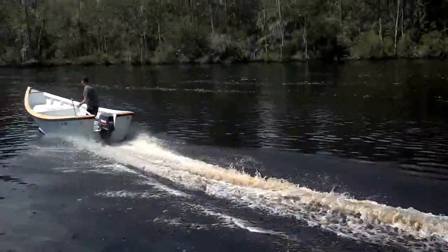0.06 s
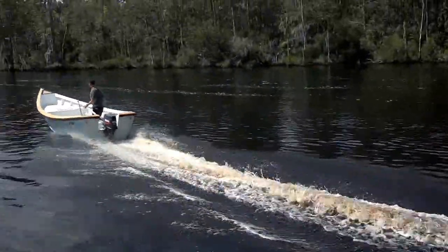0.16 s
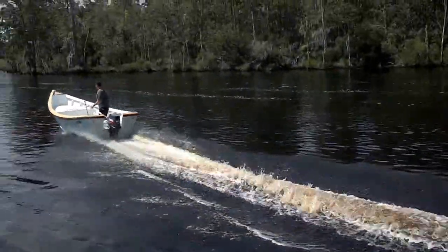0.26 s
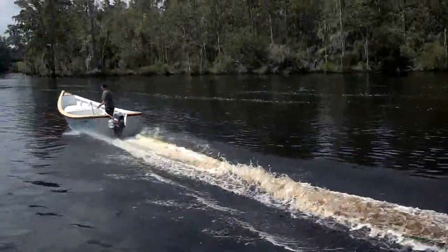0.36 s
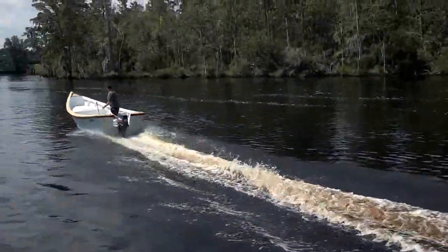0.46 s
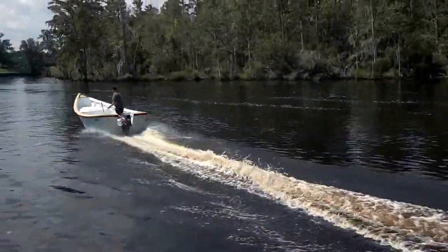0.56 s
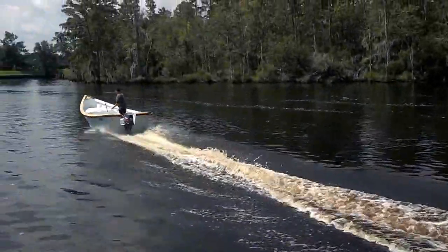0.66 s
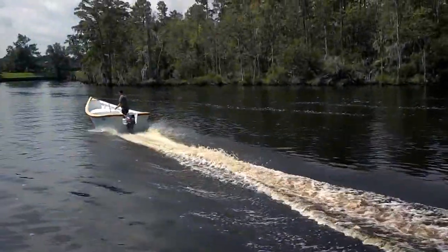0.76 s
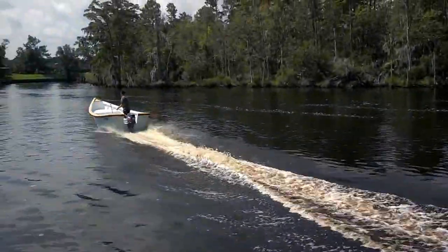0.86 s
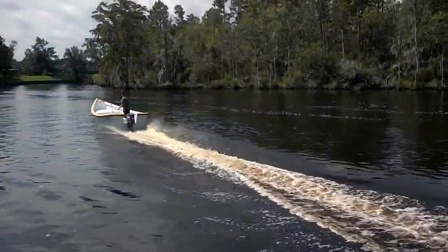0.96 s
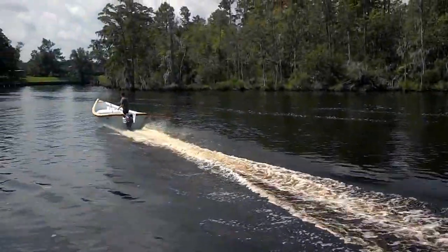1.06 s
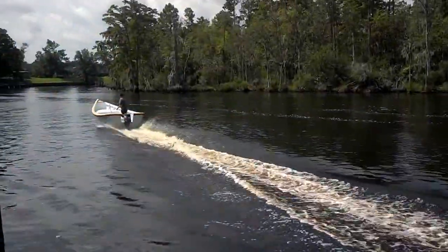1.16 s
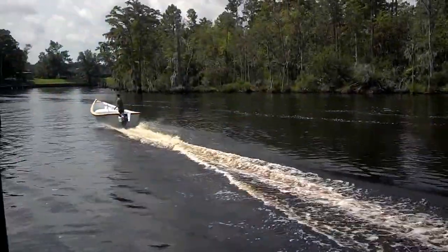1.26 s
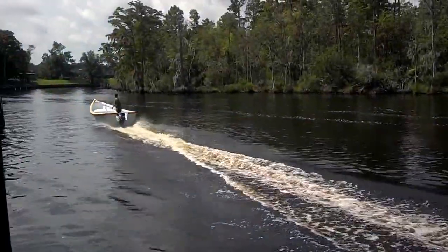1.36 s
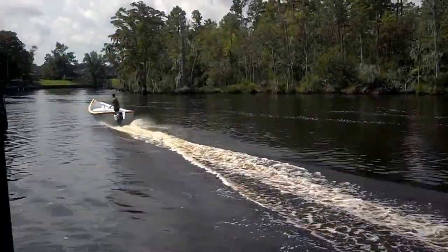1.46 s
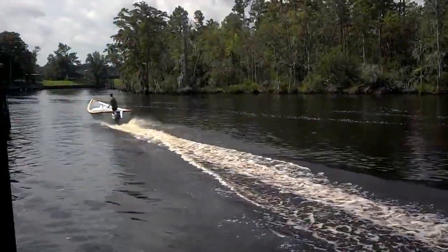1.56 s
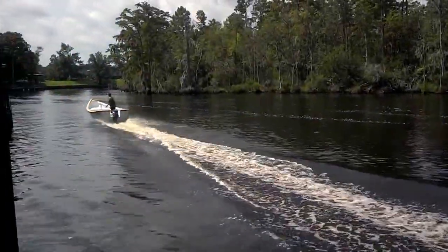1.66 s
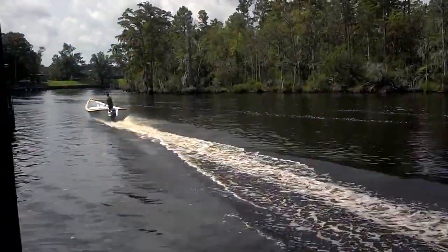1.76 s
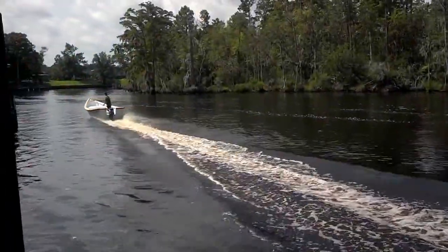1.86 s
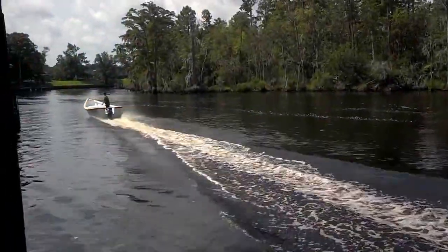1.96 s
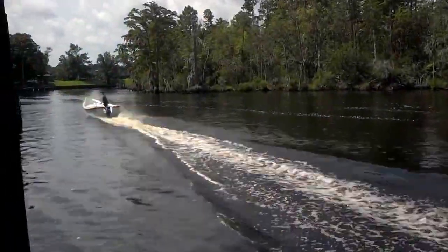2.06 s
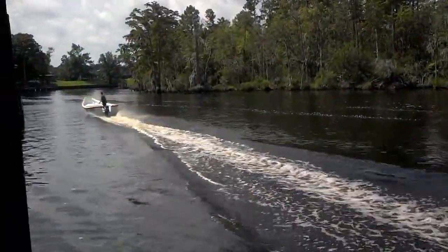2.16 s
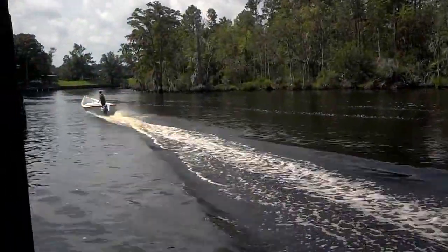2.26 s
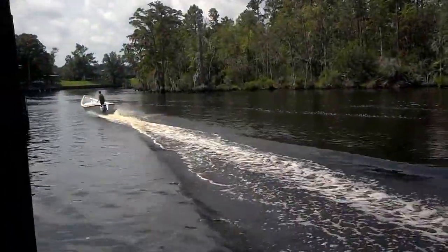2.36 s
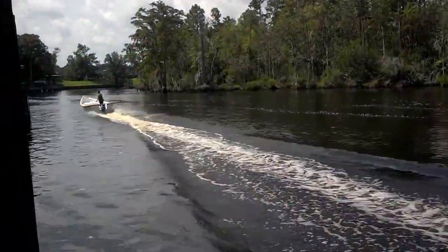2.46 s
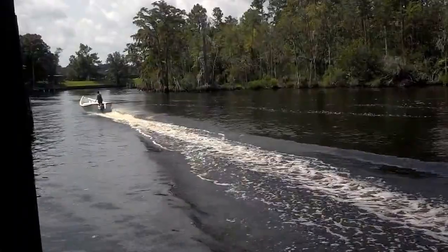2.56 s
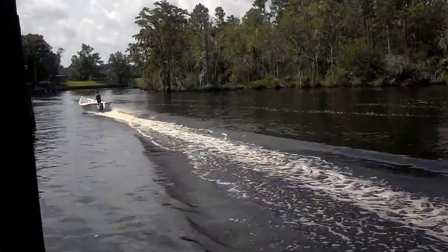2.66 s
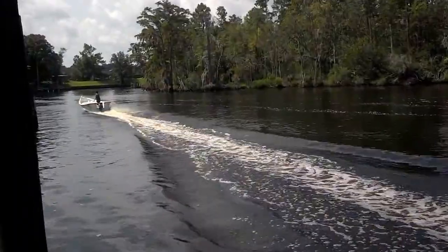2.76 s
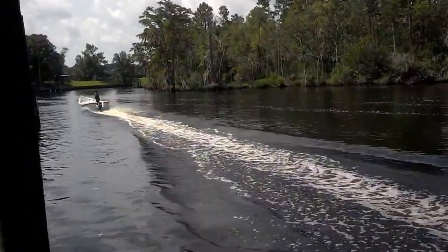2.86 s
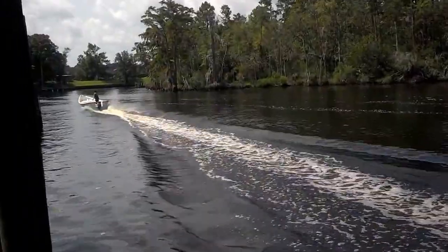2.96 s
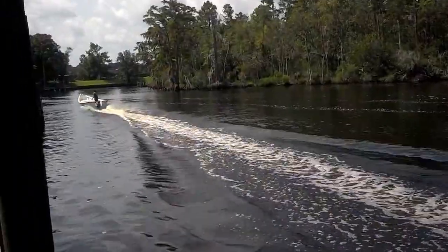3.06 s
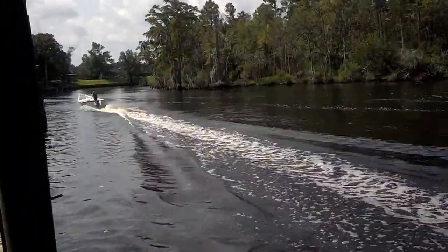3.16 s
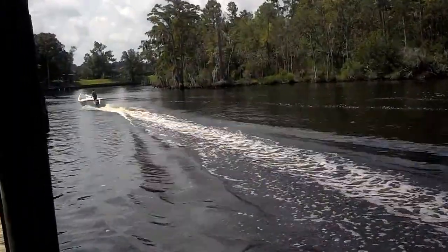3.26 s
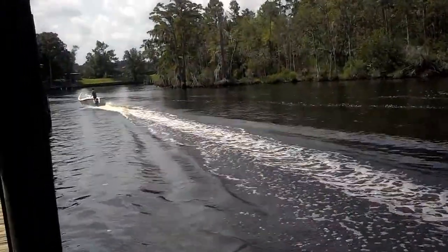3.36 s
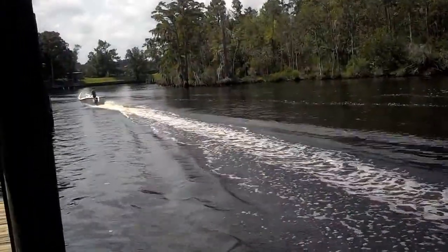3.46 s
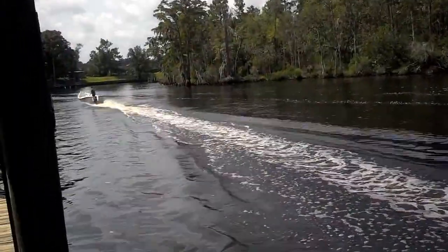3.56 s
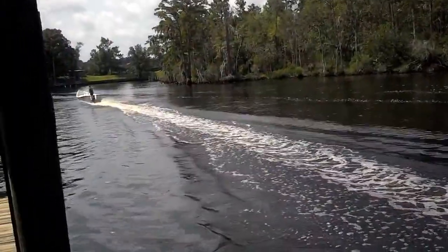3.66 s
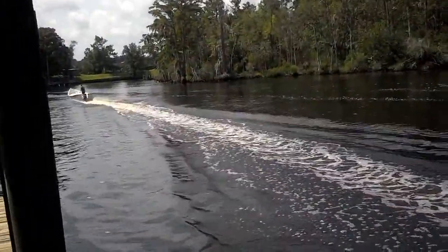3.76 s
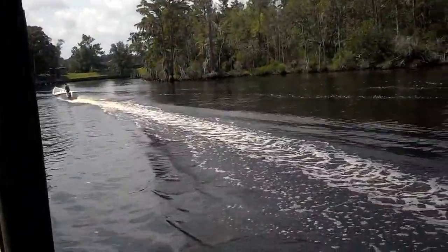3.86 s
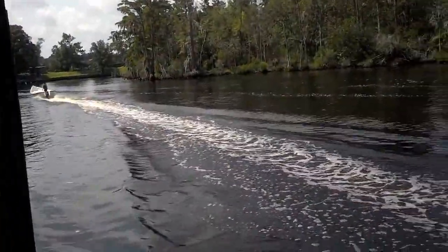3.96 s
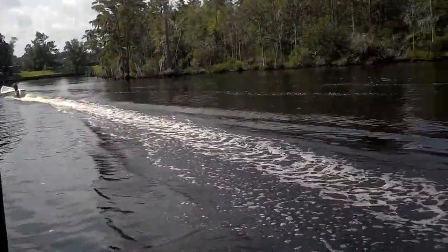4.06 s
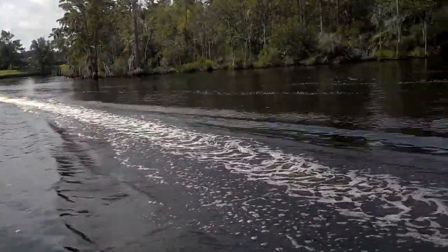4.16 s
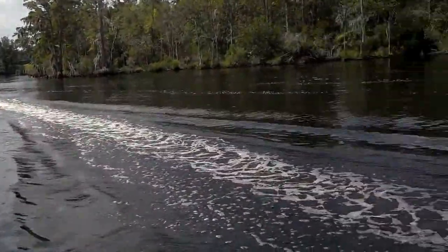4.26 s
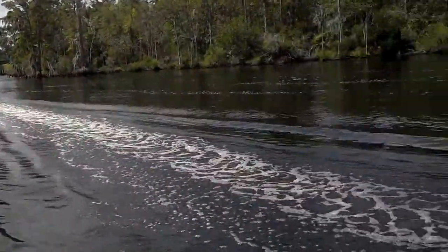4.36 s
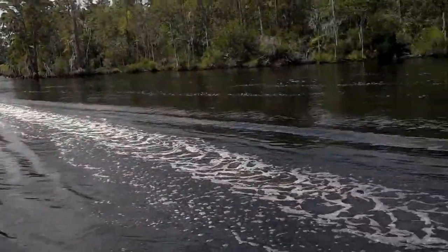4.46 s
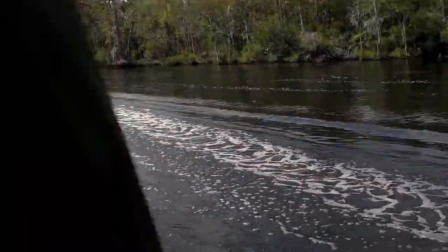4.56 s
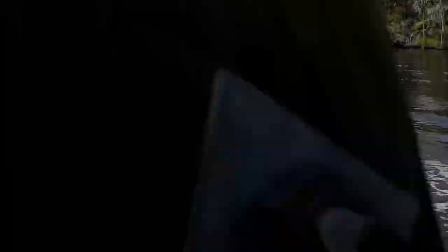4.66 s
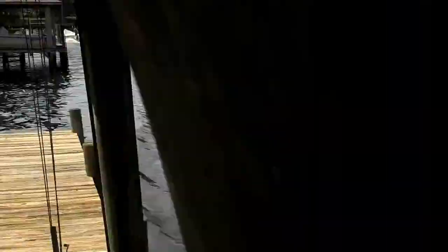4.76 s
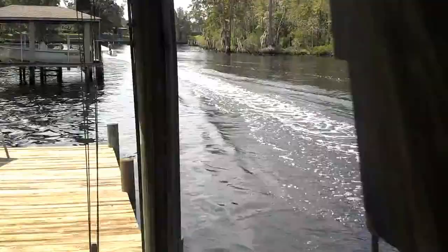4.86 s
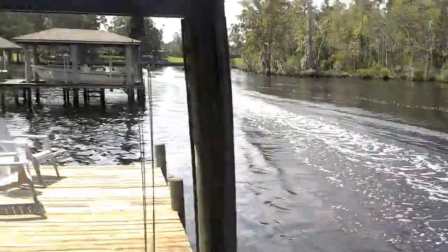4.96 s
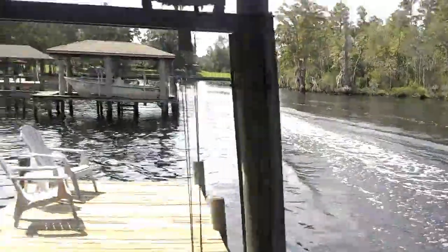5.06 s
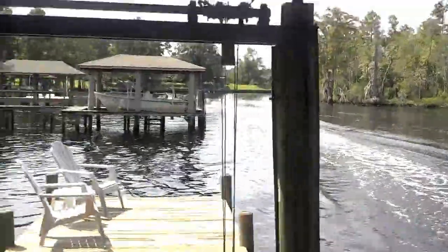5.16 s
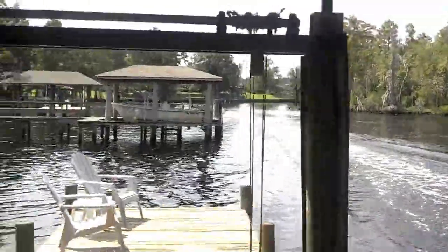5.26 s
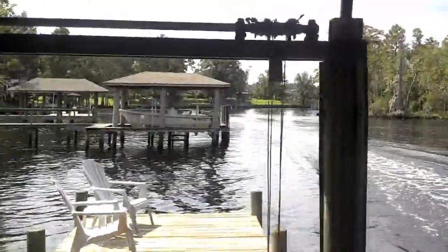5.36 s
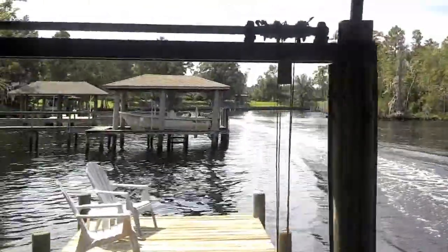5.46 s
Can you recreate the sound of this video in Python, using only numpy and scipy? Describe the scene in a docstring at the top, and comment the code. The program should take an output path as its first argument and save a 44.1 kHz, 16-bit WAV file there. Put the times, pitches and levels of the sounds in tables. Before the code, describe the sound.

From the first moment an outboard motor is close across open river water: a steady low drone near 255 Hz, a raspy buzz of higher engine tones and a rough, throaty roar, with bright, grainy hiss from the churning wake. The engine speed barely changes. Over the first two seconds the hiss drops as the boat recedes, with small spray surges around 1.5 to 2 and near 3 seconds. Between 1.7 and 2.7 the buzz shifts in colour as the stern faces the listener, and the drone flutters and dips over chop. From about 4.1 soft low wind bumps strike the microphone. At 4.6 a tick sounds and a post abruptly dulls the boat, which returns within half a second. More tiny ticks come at 4.9 and 5.2. The engine is weaker by the end at 5.5, with a last spray surge and faint, very high insect sizzle rising.

```python
"""A small outboard boat runs away up a river, heard from a dock through two closely spaced microphone ports.
First the exhaust drones close by at three beats a cycle, over buzzing engine lines, a rough noise roar and
the hiss of the wake. The hiss falls as the boat recedes, and from 1.7 to 2.7 s the lines turn to those astern.
After 4 s wind bumps the ports and a few ticks sound; at 4.6 s a post shades boat and wake for a moment.
At the end the insects' high sizzle, faint until then, grows as the microphone turns to the bank."""
import sys
import numpy as np
from scipy import signal
from scipy.fft import rfft, irfft, next_fast_len
from scipy.io import wavfile
from scipy.ndimage import uniform_filter1d, map_coordinates

SR = 44100
rng = np.random.default_rng(int(sys.argv[2]) if len(sys.argv) > 2 else 0)


def generate_wav(sig):
    """Save sig (samples, or channels by samples) to the path in sys.argv[1] as 16-bit PCM at SR."""
    pcm = np.round(np.clip(np.atleast_2d(sig).T, -1, 1) * 32767).astype(np.int16)
    wavfile.write(sys.argv[1], SR, pcm)


N = 242991
T = np.arange(N) / SR  # time [s]


def amp(db):
    """Decibels to a linear factor."""
    return 10 ** (np.asarray(db) / 20)


def unit(x):
    """Scale to rms 1, over all channels together."""
    return x / np.sqrt(np.mean(x ** 2) + 1e-20)


def along(points, hz):
    """Interpolate (frequency, value) points on a log frequency axis."""
    f, v = np.transpose(points)
    return np.interp(np.log(hz + 1), np.log(f + 1), v)


def curves(rows, t=T):
    """Each column after the time, joined by straight lines."""
    s, *cols = np.transpose(rows)
    return [np.interp(t, s, c) for c in cols]


def humps(rows):
    """Sum of smooth Gaussian humps given as (time [s], height, length [s])."""
    return sum(height * np.exp(-.5 * ((T - s) / length) ** 2) for s, height, length in rows)


def wobble(rate):
    """A smooth random curve through rate knots a second."""
    coarse = T[::32]
    knots = rng.standard_normal(int(T[-1] * rate) + 4)
    return np.interp(T, coarse, map_coordinates(knots, [coarse * rate]))


def filtered(x, response):
    """Multiply the spectrum of x by a complex response of frequency."""
    m = next_fast_len(N + SR // 4)  # padded, so that filter tails do not wrap round
    hz = np.fft.rfftfreq(m, 1 / SR)
    return irfft(rfft(x, m) * response(hz), m)[..., :N]


def noise(spectrum, gate=1):
    """Two unrelated noises, gated, then coloured, then scaled together to rms 1."""
    white = rng.standard_normal((2, N))
    return unit(filtered(gate * white, lambda hz: amp(along(spectrum, hz))))


def patchy(x, depth_db):
    """Churned water: patches of random gain, a few hundred Hz wide and some 60 ms long."""
    z = signal.stft(x, nperseg=512)[2]
    field = rng.standard_normal(z.shape[1:])  # the same patches in both channels
    field = uniform_filter1d(field, size=4, axis=0)
    field = uniform_filter1d(field, size=10, axis=1)
    return signal.istft(z * amp(depth_db * unit(field)), nperseg=512)[1][..., :N]


# the post's shadow: the sound drops at once, stays low, then returns
SHADE_S, SHADE_FALL_S, SHADE_HOLD_S, SHADE_RETURN_S = 4.594, 0.006, 0.17, 0.4


def shade():
    """How far the post shields the microphone, 0-1."""
    corners_s = SHADE_S + np.cumsum([0, SHADE_FALL_S, SHADE_HOLD_S, SHADE_RETURN_S])
    return np.interp(T, corners_s, [0, 1, 1, 0])


# sizzle colour: (frequency [Hz], relative level [dB])
INSECT_SPECTRUM = [(6000, -45), (10500, -14), (12000, -4.5), (13500, 0), (15000, 5), (16000, -17)]
# the sizzle grows late, as the microphone turns to the bank: (time [s], level [dB])
BANK_LEVEL = [(0, -47), (2.3, -56.5), (4.2, -57), (4.72, -58), (5.1, -45), (5.51, -38)]


def insects():
    """A high sizzle from the bank: treble noise made ragged by fast random level changes."""
    level_db = curves(BANK_LEVEL)[0] + 2.1 * wobble(130)
    return amp(level_db) * noise(INSECT_SPECTRUM)


# wind colour: (frequency [Hz], relative level [dB])
WIND_SPECTRUM = [(25, -25), (60, -25), (105, -7), (170, -14), (260, -26), (600, -19), (2000, -70)]
# wind bumps on the ports: (time [s], level [dB], length [s])
WIND_BUMPS = [(4.09, -32, 0.021), (4.385, -32.5, .018), (4.456, -33, 0.024), (4.514, -38, 0.02),
              (4.58, -34, .015), (4.73, -38.5, 0.022), (5.06, -43, .02), (5.5, -43, 0.051)]


def wind_bumps():
    """Short low puffs of wind over a faint steady rumble, mostly opposed between the channels."""
    push = humps((s, amp(db), length) for s, db, length in WIND_BUMPS)
    rumble = amp(-57.0)
    mid, side = (push + rumble) * noise(WIND_SPECTRUM)
    return np.array([0.14 * mid + side, 0.29 * mid - side])


# handling ticks: (time [s], level [dB], length [s])
HANDLING_TICKS = [(4.597, -30.5, .0011), (4.896, -38, .004), (5.243, -32, .002)]


def ticks():
    """Tiny bright clicks: treble noise that rises and dies exponentially."""
    envelope = sum(amp(db) * np.exp(-np.abs(T - s) / length) for s, db, length in HANDLING_TICKS)
    return envelope * noise([(1000, -18), (8000, -8.0), (14000, 1.0)])


# hiss colour: (frequency [Hz], relative level [dB])
WAKE_SPECTRUM = [(300, -26), (1500, 4), (3500, 9.5), (5500, 3.5), (7500, 0), (11000, -4), (15500, -1)]
# surges of spray: (time [s], lift [dB], length [s])
SPRAY_SURGES = [(1.55, 5, 0.056), (1.83, 5, 0.13), (2.07, 3, 0.032), (3.93, 2.5, .08), (2.9, 5.5, 0.42),
                (5.45, 7, 0.1)]
# level at the start; loss per tenfold distance; time to double the distance
HISS_DB, HISS_FALL_DB, RECEDE_S = -39.0, 16.5, 0.84
SHADE_HISS_DB, SPRAY_PATCHY_DB = 5, 1.3


def wake():
    """Spray and bursting foam: a fine, grainy, patchy hiss that surges and recedes."""
    distance = 1 + T / RECEDE_S  # relative to the start
    hiss_db = HISS_DB - HISS_FALL_DB * np.log10(distance)
    hiss_db = hiss_db + humps(SPRAY_SURGES) - SHADE_HISS_DB * shade() + 1.15 * wobble(13)
    grains = amp(0.83 * wobble(600))
    return amp(hiss_db) * patchy(noise(WAKE_SPECTRUM, grains), depth_db=SPRAY_PATCHY_DB)


# a broad band swells or sinks as the paths over water and dock change:
# (time [s], centre [Hz], lift [dB])
WANDERING_BAND = [(0, 794, -7), (.35, 770, -5), (.55, 895, 2), (.8, 970, 1.5), (1.15, 880, 2),
                  (2.1, 730, 3), (2.35, 1680, -1.5), (3.8, 1660, -3), (4.35, 2180, 5.5), (4.55, 1940, 1.5),
                  (4.66, 1150, -3), (4.95, 1250, -6), (5.12, 845, -5), (5.35, 790, -2), (5.51, 800, -3)]
# bands that ring or sink while falling in pitch, in the close wash and beside the post:
# (time [s], length [s], centre [Hz], fall [octaves/s], lift [dB], width [octaves])
FALLING_BANDS = [(0.11, .11, 470, .6, 4.8, 0.4), (0.308, 0.1, 470, 0.88, 5, 0.18),
                 (.45, 0.36, 2320, .8, 3, .09), (1.66, 0.26, 2080, .1, 2.5, 0.2),
                 (4.54, 0.038, 455, .5, 5, 0.27), (4.56, 0.16, 2600, .2, 9, 0.24),
                 (5.2, 0.081, 1040, 0.81, 12, 0.047), (4.92, 0.14, 423, .1, -4, 0.17),
                 (5.18, 0.058, 1630, 1.6, 6, 0.083), (5.37, 0.085, 570, 1.2, 8.5, 0.085),
                 (5.418, 0.054, 400, .5, 4, 0.31)]


def swell(x, octaves=.17):
    """Changing sound paths: lift or cut one wandering band and brief falling ones."""
    hz, t, z = signal.stft(x, SR, nperseg=1536)

    def bell(centre, width):
        distance = np.log2((hz[:, None] + 1) / centre)
        return np.exp(-.5 * (distance / width) ** 2)

    centre, lift_db = curves(WANDERING_BAND, t)
    gain_db = lift_db * bell(centre, octaves)
    for s, length, start_hz, fall, db, width in FALLING_BANDS:
        envelope = np.exp(-.5 * ((t - s) / length) ** 2)
        falling_hz = start_hz * 2 ** (-fall * (t - s))
        gain_db = gain_db + db * envelope * bell(falling_hz, width)
    return signal.istft(z * amp(gain_db), SR, nperseg=1536)[1][..., :N]


# exhaust beats, also the knocks of the buzz: (place in the cycle [0-1], strength [linear])
EXHAUST_BEATS = [(.2, .33), (.6, .45), (.98, .33)]


def beat(cycle, width, floor):
    """Strength of the gas flow: one pulse per beat through the engine cycle, over a floor."""
    pulses = (size * np.exp((np.cos(2 * np.pi * (cycle - at)) - 1) / width) for at, size in EXHAUST_BEATS)
    return floor + sum(pulses)


# engine lines: (multiple of the cycle rate, relative level close by [dB], relative level far astern [dB])
ENGINE_LINES = [(4, -10.5, -6), (5, -11, -12), (7, -17, -19), (8, -11.5, -12), (9, -8.5, -5.5),
                (10, -9.5, -11), (11, -18, -8), (12, -8, -8.5), (13, -16, -10), (14, -6.5, -5.5),
                (15, -14, -11.5), (16, -19, -13.5), (17, -19, -24.5), (18, -25, -22), (19, -19, -20.5),
                (20, -16, -7), (21, -8, -12), (22, -16, -16), (23, -17, -32), (24, -16.5, -29),
                (26, -23, -25)]
# single lines flare or fade as the reflection off the water shifts:
# (multiple of the cycle rate, time [s], lift [dB], length [s])
LINE_FADES = [(4, 4.6, -15, 0.075), (5, 0.11, -2.5, 0.14), (9, 0.22, -11, 0.33), (11, 0.14, 16, 0.15),
              (12, 0.79, 5.5, 0.13), (12, 2, -14, 0.34), (12, 4.24, 3, 0.1), (13, 0.31, 10, .13),
              (14, 0.077, -6, 0.13), (14, 0.81, 3, 0.05), (14, 1.53, 4.5, 0.22), (14, 2.73, -4, 0.28),
              (14, 5, -9, 0.28), (16, .2, 12.5, 0.35), (20, 0.87, -0.5, 0.78), (20, 2.48, 3, 0.098),
              (20, 3.2, -5, 0.067), (20, 4.17, 1, 0.17), (20, 4.48, -19, 0.072), (20, 5.2, -4, 0.16),
              (21, 0.47, -10.5, 0.84), (21, 1.66, 3.5, 0.2), (24, 4.42, 13, .17), (26, 5.4, 13, .16),
              (17, 0.97, 1, 0.36), (13, 5.13, 5, .06), (11, 5.32, 5, 0.08), (10, 4.8, -9, 0.33),
              (22, 4.38, 5.5, 0.12), (9, 4.8, -6, .2), (16, 4.25, 4, .15), (21, 4.8, -7, 0.34),
              (4, 5.4, 5, .08)]
NEAR_UNTIL_S, FAR_FROM_S = 1.74, 2.66  # close-by lines give way to those from astern
SHADE_TILT_DB_PER_OCTAVE = 1  # the post takes more from high lines
# casing ring smears each line's phase; slow phase drift; shaft timing wavers for all lines alike
SMEAR_RAD, DRIFT_RAD, JITTER_CYCLES = .52, .35, .006
# ripples flutter the buzz as a whole, and each line on its own
BUZZ_FLUTTER_DB, LINE_FLUTTER_DB = .9, 1.5


def buzz(cycle, level_db):
    """Three uneven knocks each cycle, as harmonic lines in step that fade in and out over the rippled water."""
    astern = np.interp(T, [NEAR_UNTIL_S, FAR_FROM_S], [0, 1])
    tilt_db = SHADE_TILT_DB_PER_OCTAVE * shade()
    shaft = cycle + JITTER_CYCLES * wobble(22)
    lines = np.zeros(N)
    for multiple, near_db, far_db in ENGINE_LINES:
        k = round(multiple)
        knocks = sum(size * np.exp(-2j * np.pi * k * at) for at, size in EXHAUST_BEATS)
        phase = np.angle(knocks) + SMEAR_RAD * rng.standard_normal() + DRIFT_RAD * wobble(1.19)
        line_db = near_db + astern * (far_db - near_db)
        line_db = line_db + 1.24 * wobble(4.014) + LINE_FLUTTER_DB * wobble(16)
        line_db = line_db - tilt_db * np.log2(k)
        line_db = line_db + humps(row[1:] for row in LINE_FADES if round(row[0]) == k)
        lines += amp(line_db) * np.cos(2 * np.pi * k * shaft + phase)
    return amp(level_db - 1.74 + BUZZ_FLUTTER_DB * wobble(14)) * unit(lines)


# exhaust drone before dips and shade: (time [s], level [dB])
DRONE_LEVEL = [(0, -27.5), (.09, -22), (1, -20.5), (1.25, -21.5), (1.56, -20), (1.8, -20.8), (2.45, -20),
               (2.8, -22.5), (3.15, -20.5), (3.48, -22.5), (3.95, -25), (4.35, -22), (4.57, -24),
               (4.7, -24), (4.97, -29.5), (5.28, -34.5), (5.38, -26.5), (5.51, -34.5)]
# the drone's octave comes and goes with the heading: (time [s], level [dB])
OCTAVE_LEVEL = [(0, -39.5), (.28, -35.5), (.72, -40.5), (1.0, -32.5), (1.12, -33.5), (1.27, -30.5),
                (1.6, -34), (1.8, -37.5), (2.6, -39), (2.75, -31), (3.2, -37.5), (3.4, -32), (3.65, -35.5),
                (3.95, -28.5), (4.07, -34), (4.2, -30.5), (4.35, -36.5), (4.62, -40), (4.8, -32.5),
                (5.15, -41), (5.42, -38), (5.51, -44)]
# the drone dips, or leaps where negative, as the hull bobs over chop: (time [s], depth [dB], length [s])
CHOP_DIPS = [(1.338, 3, 0.026), (1.66, 6, 0.029), (1.835, 3, .02), (2.0, 4.5, 0.036), (2.095, -2, 0.02),
             (2.25, 4, 0.05), (2.55, 4.5, 0.035), (2.66, -3.5, .02), (2.7, 4, 0.02), (2.86, 4, 0.026),
             (3.03, 3.5, 0.026), (3.61, 4, 0.031), (3.885, 4, .025), (4.435, 9, 0.021), (4.63, 4, 0.017)]
SHADE_DRONE_DB = 4


def exhaust(cycle):
    """Cosines at the beat rate and its octave, fluttering as water washes over the outlet."""
    shaded_db = SHADE_DRONE_DB * shade()
    drone_db = curves(DRONE_LEVEL)[0] - humps(CHOP_DIPS) - shaded_db + 1.18 * wobble(36)
    drone = amp(drone_db) * np.cos(2 * np.pi * 3 * cycle)  # three beats a cycle
    octave_db = curves(OCTAVE_LEVEL)[0] - shaded_db + 2.2 * wobble(21.98)
    waver = .35 * wobble(20)  # phase [rad]
    octave = amp(octave_db) * np.cos(2 * np.pi * 6 * cycle + waver)
    return drone + octave


# engine speed: (time [s], cycle rate [Hz])
ENGINE_SPEED = [(0.0, 84.6), (0.75, 84.62), (2.36, 85.32), (3.14, 85.44), (3.93, 85.48), (4.5, 85.2),
                (5.11, 85.5), (5.5, 85.22)]
# how far the buzz lines stand out of the roar: (time [s], level difference [dB])
LINE_CLARITY = [(0, 1), (1, 2.5), (2.2, 3.5), (3.2, 5), (4.2, 1.5), (4.55, 4), (4.75, 0.5), (5.25, 3.5),
                (5.51, -2)]
# roar colour: (frequency [Hz], relative level [dB])
ROAR_SPECTRUM = [(30, -22), (60, -19), (90, -12.5), (170, 2), (300, -1), (450, 2.5), (650, 1.5), (900, 2.5),
                 (1200, 0), (1500, -5), (1950, -2.5), (2400, -9), (3200, -20.5), (4500, -24)]
# phase lead of the difference across the ports: (frequency [Hz], lead [rad])
PORT_LEAD = [(250, 0.88), (700, 0.76), (1200, 0.97), (1700, 1.05), (2400, 1.66), (3400, 4.34)]
# the microphone's turn changes the difference across the ports: (time [s], level [dB])
TURN_LEVEL = [(0, -2.5), (1.3, -3), (2.5, -2), (3.7, -2), (4.3, 0), (4.8, -3.5), (5.1, -1.5), (5.4, -5)]
SHADE_ROAR_DB = 4.8  # the post takes this much more from the roar, leaving the hum bare
ROAR_FLUTTER_DB, ROAR_PATCHY_DB = .6, 1.4


def outboard(engine_db):
    """Drone, buzz and a noise roar that puffs with each beat: (sum, difference) at the ports."""
    cycle = np.cumsum(curves(ENGINE_SPEED)[0]) / SR
    clarity_db = curves(LINE_CLARITY)[0]
    puffs = noise(ROAR_SPECTRUM, beat(cycle, width=0.0092, floor=1.0))
    roar_db = engine_db - clarity_db / 2 - SHADE_ROAR_DB * shade() + ROAR_FLUTTER_DB * wobble(16)
    roar, scattered = amp(roar_db) * patchy(puffs, depth_db=ROAR_PATCHY_DB)
    tones = exhaust(cycle) + buzz(cycle, engine_db + clarity_db / 2)
    across = filtered(tones + 1.07 * roar, lambda hz: np.exp(1j * along(PORT_LEAD, hz)))
    across = amp(curves(TURN_LEVEL)[0]) * (across + .5 * scattered)
    return swell(np.array([tones + roar, across]))


# pressure difference across the ports: (frequency [Hz], level against their sum [dB])
PORT_DIFFERENCE = [(100, -20), (250, -14.5), (500, -12), (1000, -5.5), (1800, 7.5), (3500, 2), (15000, 2.5)]
PORT_DELAY_S = 16 / 44100


def ports(pair):
    """Each channel is one port minus the other delayed, so mid and side take turns along frequency."""
    def response(hz):
        turn = np.pi * hz * PORT_DELAY_S
        shares = np.array([np.sin(turn), np.cos(turn) * amp(along(PORT_DIFFERENCE, hz))])
        return shares / np.hypot(*shares)

    mid, side = filtered(pair, response)
    return np.array([mid + side, mid - side])


# shared base of buzz and roar, before surges and shade: (time [s], level [dB])
ENGINE_LEVEL = [(0, -28), (.11, -26.5), (.2, -29), (.26, -27), (.4, -28.5), (.8, -28.5), (1.25, -29.5),
                (1.35, -30.5), (1.46, -29), (1.68, -31.5), (2.08, -30), (2.2, -32), (2.8, -30.5),
                (4.15, -30.5), (4.5, -34.5), (4.58, -31.5), (5.2, -37), (5.51, -37)]
SURGE_SHARE = 0.11  # the spray surges lift buzz and roar a little too
SHADE_ENGINE_DB = 3.5


def scene():
    """Bank, ticks, wake and boat through the two ports, with wind on top."""
    engine_db = curves(ENGINE_LEVEL)[0] + SURGE_SHARE * humps(SPRAY_SURGES) - SHADE_ENGINE_DB * shade()
    return ports(insects() + ticks() + wake() + outboard(engine_db)) + wind_bumps()


def record(dry):
    """The microphone keeps nothing above its band limit."""
    return filtered(dry, lambda hz: hz < 15850)


dry = scene()
out = record(dry)
generate_wav(out)
```